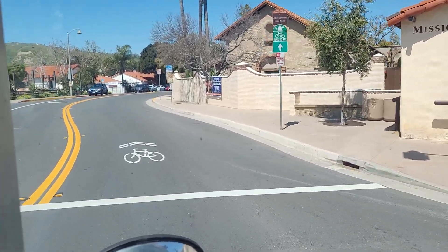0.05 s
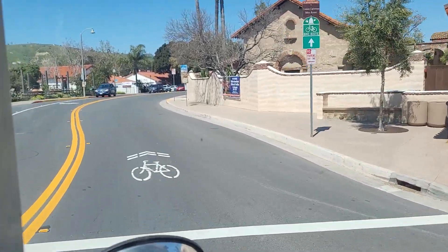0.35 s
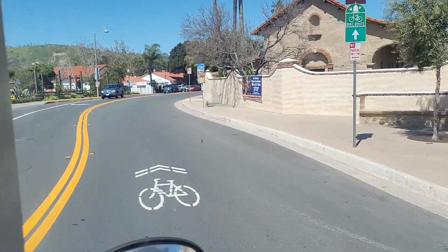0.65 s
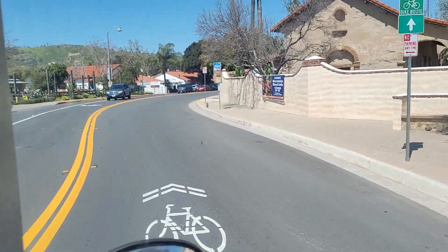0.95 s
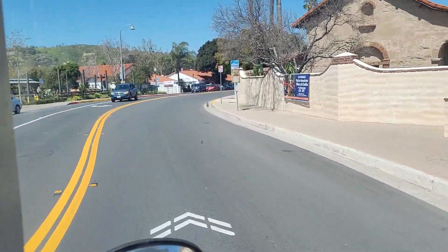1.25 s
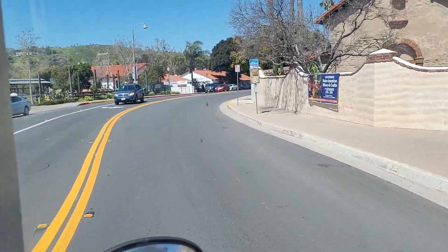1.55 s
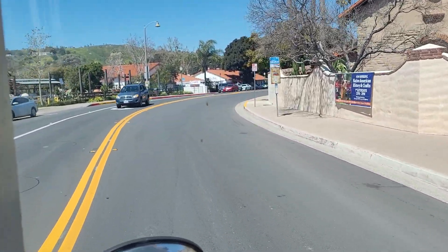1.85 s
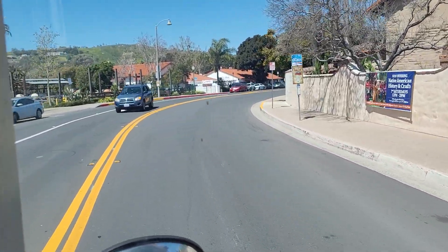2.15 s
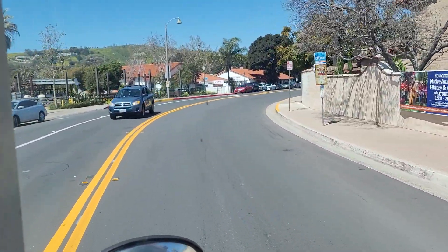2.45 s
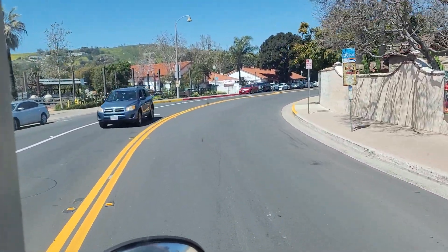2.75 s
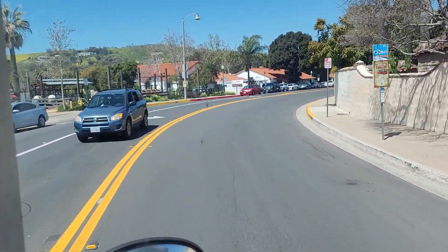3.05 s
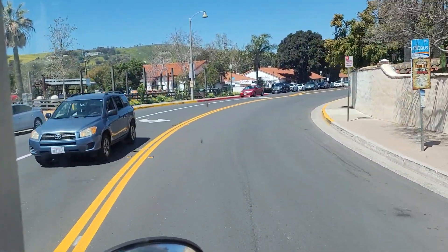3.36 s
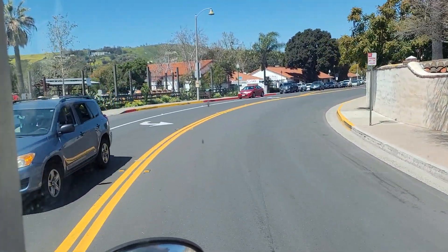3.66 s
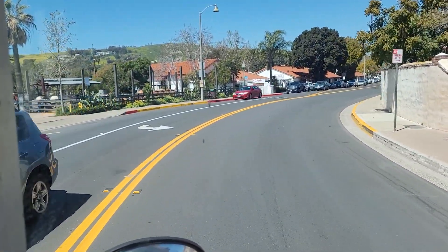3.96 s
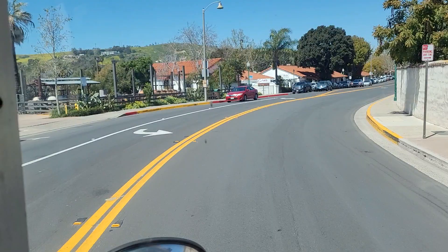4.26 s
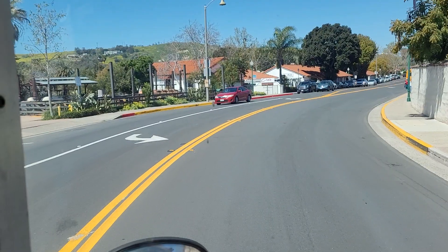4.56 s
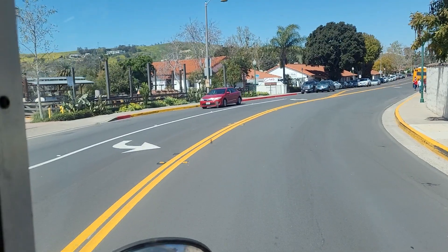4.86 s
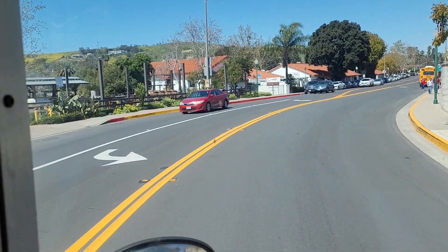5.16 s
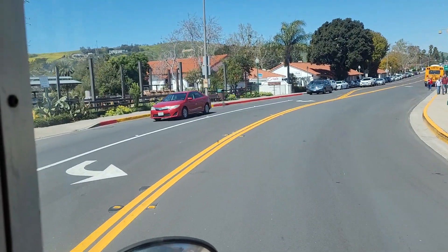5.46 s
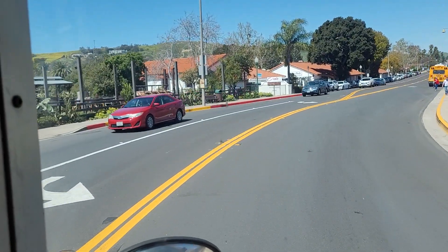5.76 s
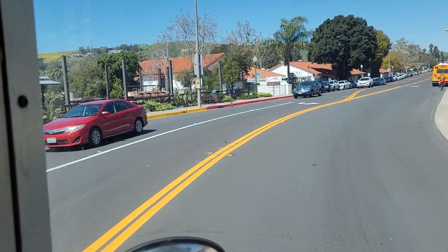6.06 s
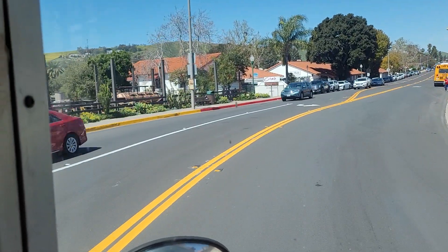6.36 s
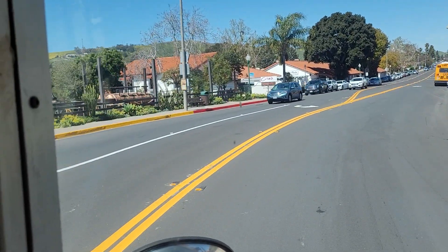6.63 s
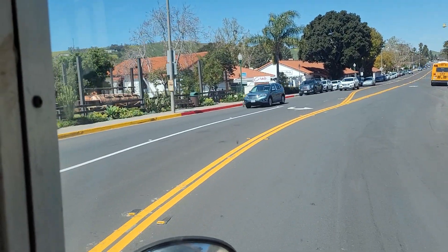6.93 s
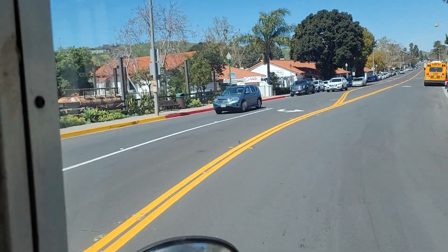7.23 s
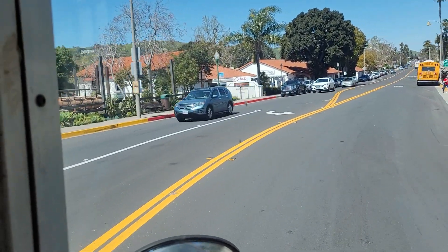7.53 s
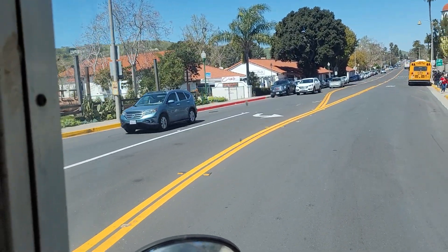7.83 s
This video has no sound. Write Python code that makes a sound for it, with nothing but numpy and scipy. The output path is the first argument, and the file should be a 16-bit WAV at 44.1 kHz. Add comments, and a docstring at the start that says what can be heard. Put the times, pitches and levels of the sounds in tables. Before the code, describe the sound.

A bus drives along with a deep, wavering engine boom and tyres rumbling through the floor, heard from inside near the front. Small ticks, rattles and occasional panel knocks come from around the cabin, with soft air hiss behind them. Later the engine slows, a panel hums briefly and metal clinks once. The drone then swells again at a lower pitch, and the gears give a brief, rough whine.

```python
"""You hear a bus engine boom and drone from inside the small, hard cabin as the bus rounds a bend.
It eases off near 5.4 s, then pulls again at lower revs with a short whine from the gears.
Tyres rumble through the floor and air hisses at the door. Loose fittings tick and chatter,
trim rubs and squeaks, jolted panels knock, and one metal part clinks."""
import sys
import numpy as np
from scipy import signal
from scipy.fft import rfft, irfft, next_fast_len
from scipy.io import wavfile
from scipy.ndimage import map_coordinates

SR = 44100
rng = np.random.default_rng(int(sys.argv[2]) if len(sys.argv) > 2 else 0)


def dump(signal):
    """Clip the signal to [-1, 1] and save it as 16-bit WAV at the path in sys.argv[1]."""
    limited = np.clip(np.atleast_2d(signal).T, -1, 1)
    pcm = np.round(limited * 32767).astype(np.int16)
    wavfile.write(sys.argv[1], SR, pcm)


N = 352359
TIME = np.arange(N) / SR  # seconds since the start
AFTER = np.arange(SR // 3) / SR  # seconds since a short sound began

# the changing road surface: (time [s], tyre level [dB], door hiss level [dB])
ROAD = [(0, -45, -56.5), (.13, -45, -58.5), (.45, -48, -62.5), (.9, -48.5, -60), (1.2, -50, -64.5),
        (1.55, -47.5, -61.5), (2.1, -50, -61.5), (2.7, -50, -65), (3.05, -50, -59), (3.4, -50, -64),
        (3.95, -50.5, -65.5), (4.65, -50, -64), (5, -47.5, -60), (5.3, -50, -64), (6.35, -52, -65.5),
        (6.62, -48.5, -60.5), (6.9, -49.5, -64.5), (7.4, -46.5, -62.5), (7.75, -50.5, -67.5),
        (7.99, -49.5, -64)]


def amp(db):
    """Turn decibels into a number to multiply a sound by."""
    return 10 ** (np.asarray(db) / 20)


def along(points, hz):
    """Read between (frequency, value) points on a log frequency scale."""
    freqs, values = np.transpose(points)
    return np.interp(np.log(hz + 1), np.log(freqs + 1), values)


def curves(rows):
    """One value per sample for each column after the time."""
    times, *columns = np.transpose(rows)
    return [np.interp(TIME, times, column) for column in columns]


def wobble(rate):
    """A smooth random curve through `rate` new values a second."""
    return map_coordinates(rng.standard_normal(int(N * rate / SR) + 4), [TIME * rate])


def swells(rows, floor_db):
    """A steady strength with bell-shaped swells on top."""
    bells = (amp(db) * np.exp(-.5 * ((TIME - s) / width) ** 2) for s, width, db in rows)
    return np.sqrt(amp(floor_db) ** 2 + sum(bell ** 2 for bell in bells))


def fade(seconds):
    """The dying away after a blow: 60 dB down in the given time."""
    return amp(-60 * AFTER / seconds)


def peak(hz, centre, width):
    """A resonance: 1 at its centre, 0.5 half a width away."""
    return 1 / (1 + (2 * (hz - centre) / width) ** 2)


def filtered(x, response):
    """Scale each frequency in x by response(hz)."""
    n = x.shape[-1]
    padded = next_fast_len(n + 8192)
    return irfft(rfft(x, padded) * response(np.fft.rfftfreq(padded, 1 / SR)), padded)[..., :n]


def noise(shape_db, size=N):
    """Stereo noise of strength (rms) 1: both sides alike in the bass, different in the treble."""
    # how alike left and right are: (frequency [Hz], likeness [0 to 1])
    likeness = [(60, 0.81), (150, 1), (260, 1), (400, 0.63), (650, 0.31), (1200, 0.47), (3000, 0.17),
                (8000, 0.062)]
    turn = lambda hz: np.arccos(along(likeness, hz)) / 2
    response = lambda hz: amp(shape_db(hz)) * [np.cos(turn(hz)), np.sin(turn(hz))]
    mid, side = filtered(rng.standard_normal((2, size)), response)
    stereo = np.array([mid + side, mid - side])
    return stereo / np.sqrt(np.mean(stereo ** 2) + 1e-20)


def rush(spectrum, size=N):
    """Noise shaped by points of (frequency [Hz], level [dB])."""
    return noise(lambda hz: along(spectrum, hz), size)


def band(centre_hz, spread):
    """Short noise around one pitch; spread is a fraction of that pitch."""
    return noise(lambda hz: -10 * np.log10(1 + ((hz - centre_hz) / (spread * centre_hz)) ** 4), len(AFTER))


def tone(hz, flutter_db, rate):
    """A sine wave that follows a pitch curve and wavers in level."""
    cycles = np.cumsum(hz) / SR + rng.random()
    return np.sqrt(2) * np.sin(2 * np.pi * cycles) * amp(flutter_db * wobble(rate))


def add(track, s, sound):
    """Mix a sound into a track at s seconds."""
    part = track[:, max(0, round(s * SR)):][:, :sound.shape[-1]]
    part += sound[..., :part.shape[1]]


def cabin(x):
    """Windows and trim ring along; quick echoes off nearby walls colour the middle and treble."""
    # resonances of windows and trim: (frequency [Hz], width [Hz], boost [dB])
    trim = [(342, 18, 0.5), (397, 24, 3.5), (635, 14, -1.5), (1048, 31, 3.5), (1370, 100, 0.5),
            (2280, 110, 1), (2770, 69, 1), (3580, 70, 4), (4120, 390, 1), (7540, 87, -4)]
    delay_s = rng.uniform(.002, .025, (8, 1))
    strength = .1 * rng.choice([-1, 1], (8, 1))
    echoes = lambda hz: np.sum(strength * np.exp(-2j * np.pi * hz * delay_s), axis=0)
    walls = lambda hz: 1 + echoes(hz) * hz ** 2 / (hz ** 2 + 700 ** 2)
    panes = lambda hz: amp(sum(db * peak(hz, centre, width) for centre, width, db in trim) - .7)
    return filtered(x, lambda hz: panes(hz) * walls(hz))


def air():
    """Air hisses around the door and gushes once; a faint high fizz comes and goes."""
    # tone colours of the door hiss and the fizz: (frequency [Hz], level [dB])
    hiss_colour = [(1000, -20), (2000, -3), (2800, 0), (3900, -2), (5000, -4), (7200, -6), (8300, -18),
                   (10000, -30), (16000, -60)]
    fizz_colour = [(5000, -37), (9000, -3), (11500, 2.5), (14200, 3), (15700, 4), (16100, -4.5)]
    # swells of the fizz: (middle time [s], width [s], level [dB])
    fizz_swells = [(.69, .02, -66), (1.68, .05, -65), (2, 0.13, -67), (3.07, .2, -68.5), (4.05, .18, -69),
                   (4.68, 0.067, -71), (5.33, .14, -70.5), (5.88, 0.16, -68), (6.4, 0.14, -72),
                   (6.76, .08, -68), (7.17, .025, -65.5), (7.48, 0.087, -66), (7.97, .04, -64.5)]
    _, hiss_db = curves(ROAD)
    gush = amp(-59) * np.exp(-((TIME - 7.44) / .15) ** 4)  # about 0.3 s long, at 7.44 s
    hiss = np.hypot(amp(hiss_db - 1.5), gush) * amp(1.7 * wobble(60)) * rush(hiss_colour)
    fizz = swells(fizz_swells, floor_db=-78.5) * amp(.9 * wobble(70)) * rush(fizz_colour)
    return hiss + fizz


def road():
    """Bumps heave the floor and the cabin air rumbles; coarser road makes tyres and panels louder."""
    # tone colours of the floor, cabin air, panels and tyres: (frequency [Hz], level [dB])
    floor_colour = [(15, -14), (28, -12.5), (41, 2.5), (52, -6), (65, -1.5), (100, -34), (200, -89)]
    air_colour = [(20, -22.5), (36, -9.5), (52, 4), (72, 4), (84, -0.5), (98, -4), (128, -1.5), (170, -7.5),
                  (200, -6.5), (240, -6.5), (275, -23), (400, -68)]
    panel_colour = [(130, -17), (230, 4), (290, 2), (350, -2.5), (400, -6.5), (470, -6.5), (570, -12),
                    (750, -25.5), (1400, -102)]
    tyre_colour = [(300, -4), (600, 2.5), (750, 1.5), (1050, -3), (1380, -6), (1600, -11.5), (2100, -12.5),
                   (2800, -18.5), (4500, -28), (9000, -53)]
    # bumps in the road: (middle time [s], width [s], level [dB])
    bumps = [(.18, 0.064, -23), (.94, 0.073, -25.5), (1.28, 0.21, -31), (2.29, .09, -21),
             (2.88, 0.11, -24.5), (3.55, .08, -29), (5.98, .13, -34.5), (6.33, .04, -27), (6.85, 0.1, -28)]
    tyre_db, _ = curves(ROAD)
    grit = wobble(30)  # panels and tyres flicker together
    floor = swells(bumps, floor_db=-37) * rush(floor_colour)
    cabin_air = amp(-27.5 + .2 * wobble(5.1)) * rush(air_colour)
    panels = amp(-39 + .61 * (tyre_db - tyre_db.mean()) + .77 * grit) * rush(panel_colour)
    tyres = amp(tyre_db + 3.5 + .83 * grit + .25 * wobble(90)) * rush(tyre_colour)
    return floor + cabin_air + panels + tyres


def jiggle():
    """Trim keeps tapping very faintly, each piece at its own pitch."""
    out = np.zeros((2, N))
    for when, height, force in rng.random((60, 3)):
        tap = band(centre_hz=1100 * 4 ** height, spread=.25) * fade(.07)
        add(out, when * N / SR, amp(-55 + 5 * force - 10 * height) * tap)
    return out


def squeaks():
    """Two pieces of trim rub once with a thin, dry squeak; window seals give short chirps."""
    # tone colour of rubbing trim: (frequency [Hz], level [dB])
    trim_colour = [(4200, -25), (5400, 5), (6100, -8), (6600, -2), (8000, -15), (8900, -8), (10300, -17),
                   (12000, -5), (15000, -20)]
    # chirps of the seals: (middle time [s], half length [s], pitch [Hz], level [dB])
    chirps = [(1.878, .012, 4080, -57), (2.122, .018, 2000, -47.5), (3.706, 0.013, 1950, -61),
              (3.702, .016, 3950, -66)]
    out = amp(-58) * np.exp(-((TIME - 6.068) / .025) ** 4) * rush(trim_colour)  # the squeak, at 6.068 s
    for s, half, pitch_hz, db in chirps:
        rub = noise(lambda hz: 14 * np.log10(peak(hz, pitch_hz, .28 * pitch_hz)), len(AFTER))
        add(out, s - 2 * half, amp(db) * np.exp(-((AFTER - 2 * half) / half) ** 2) * rub)
    return out


def pings():
    """A small metal clip is struck and rings briefly in a few high bands."""
    blows = [(0.5254, -45.5), (.615, -43), (2.2196, -52)]
    rings = [(2800, 900, -11), (4450, 500, -5), (5600, 1200, -0.5), (6600, 500, -6), (7300, 220, 3.5),
             (11600, 300, -6), (12200, 300, -4), (14200, 2000, -15)]
    colour = lambda hz: 10 * np.log10(sum(amp(db) ** 2 * peak(hz, f, width) for f, width, db in rings))
    out = np.zeros((2, N))
    for s, db in blows:
        add(out, s, amp(db - 3) * noise(colour, len(AFTER)) * (fade(.025) + amp(-5.5) * fade(.14)))
    return out


def fitting(clack_db, sizzle_db):
    """A loose fitting rings with a dull clack and a bright sizzle, a little differently at each blow."""
    # tone colour of a fitting: (frequency [Hz], level [dB])
    colour = [(600, -2.5), (1500, 7), (2800, 5), (4000, -1), (5500, 0), (6600, 0.5), (7500, -3.5),
              (8200, -4), (8850, -8), (9600, -2), (11500, -0.5), (14000, 2.5), (15600, 0.5), (16100, 1.5)]
    # resonances of its small metal pieces: (frequency [Hz], average boost [dB])
    pieces = [(4000, 4.5), (4850, 2.5), (5600, 2), (7500, 5.5), (8850, 3.5), (11500, 4), (12400, 4)]
    tilt = [(3500, clack_db), (7000, .0063), (12000, sizzle_db)]
    strengths = 2 * rng.random(len(pieces))
    rings = lambda hz: sum(g * db * peak(hz, centre, 260) for g, (centre, db) in zip(strengths, pieces))
    return noise(lambda hz: along(colour, hz) + along(tilt, hz) + rings(hz), len(AFTER))


def rattles():
    """Loose fittings tick with a snap and a tail in the cabin, or chatter in quick, uneven contacts."""
    # single ticks: (time [s], level [dB], sizzle [dB])
    ticks = [(0.296, -47.5, -11), (.374, -54, -8), (.4277, -57.5, -4.5), (.9614, -49.5, -5.5),
             (1.1337, -49.5, -14), (1.46, -44.5, -29), (1.8386, -51, -6), (1.8765, -48.5, -7.5),
             (2.4287, -41, -11), (2.9467, -48, -4), (3.3267, -45.5, -13), (3.4828, -45.5, -10),
             (3.6097, -43.5, -13.5), (3.6438, -49, -6.5), (3.7605, -45.5, -11), (4.359, -45.5, -15.5),
             (4.9617, -45.5, -13.5), (5.3912, -46.5, -15), (5.5902, -44, -15), (5.6427, -46, -8),
             (5.66, -39.5, -15.5), (6.2222, -45, -15), (6.5926, -44.5, -12.5), (6.9466, -46.5, -12.5),
             (7.0216, -42.5, -10.5), (7.2847, -47, -33), (7.879, -47.5, -11)]
    # bouts of chatter: (middle time [s], half length [s], level [dB], sizzle [dB])
    chatter = [(0.328, 0.02, -57, 0), (0.887, 0.015, -48.5, -8.5), (0.986, .018, -47.5, -5),
               (1.512, 0.018, -55, 0), (1.87, .012, -55.5, -6.5), (2.92, 0.031, -56, -16.5),
               (3.691, 0.017, -51.5, 2.5)]
    out = np.zeros((2, N))
    for s, db, sizzle_db in ticks:
        snap = amp(4) * fade(.007) * fitting(-7, sizzle_db + 22.5)
        tail = (fade(.027) + amp(-2.5) * fade(.18)) * fitting(-.5, sizzle_db + 4.5)
        add(out, s, amp(db - 4.5) * (snap + tail))
    contact_fade = fade(.0063) + amp(-6) * fade(.13)
    for s, half, db, sizzle_db in chatter:
        contacts = rng.random(len(AFTER)) < 900 / SR  # about 900 a second
        bout = contacts * rng.exponential(size=len(AFTER)) * np.exp(-((AFTER - 2 * half) / half) ** 2)
        power = np.abs(signal.fftconvolve(bout, contact_fade ** 2)[:len(AFTER)])
        loudness = np.sqrt(power / (power.max() + 1e-12))
        add(out, s - 2 * half, amp(db + 7.5) * loudness * fitting(2.4, sizzle_db))
    return out


def clink():
    """Metal strikes metal and bounces: a bright clash whose lower part lingers in the cabin."""
    # the strike and its bounces: (time [s], level [dB])
    blows = [(6.4771, -31), (6.4791, -32), (6.489, -42)]
    # ringing notes of the metal: (frequency [Hz], level [dB], fade time [s])
    notes = [(2654, -3, .15), (2745, -4, .2), (2815, -1, .22), (3698, -6, .14), (3870, -6, .16),
             (4020, -8, .17), (7490, -7, .12), (8750, -5, .11), (8855, -4, .11), (11360, -6, .1),
             (11570, -7, .1), (14140, -8, .09)]
    # tone colours of the clash and its echo: (frequency [Hz], level [dB])
    clash_colour = [(700, -24), (1100, 3), (1400, -18), (2350, -14), (2800, 9), (3250, -6), (3900, 3),
                    (5400, -8.5), (7500, -1), (8850, -2), (9700, -7.5), (12300, -3), (16000, -8)]
    echo_colour = [(2350, -16), (2780, 1), (3200, -10), (3900, -4), (5000, -20), (9000, -27)]
    out = np.zeros((2, N))
    for s, db in blows:
        ring = sum(amp(level) * fade(fade_s) * np.sin(2 * np.pi * (hz * AFTER + rng.random((2, 1))))
                   for hz, level, fade_s in notes)
        clash = rush(clash_colour, len(AFTER)) * (fade(.029) + amp(-8.5) * fade(.16))
        echo = rush(echo_colour, len(AFTER)) * fade(.22)
        add(out, s, amp(db) * (amp(-17) * ring + clash + amp(-10) * echo) * (1 - fade(.005)))
    return out


def knocks():
    """Bumps jolt a panel: a short crack, then one fast-fading note with woody noise around it."""
    # jolts of panels and trim: (time [s], level [dB], pitch [Hz], crack [dB])
    jolts = [(1.458, -37, 1016, 5.5), (1.619, -24.5, 316, -22), (3.027, -29, 343.4, -5.5),
             (3.029, -33.5, 884, -1.5), (5.162, -37, 1143, -0.5), (5.663, -36, 1103, -4),
             (5.976, -33, 663.4, -17), (6.008, -24, 450, -20), (6.478, -38, 1050, -8.5),
             (6.912, -44, 699, 3.5), (7.036, -22, 490, -27), (7.293, -28.5, 606.3, -5.5)]
    # tone colour of the crack: (frequency [Hz], level [dB])
    crack_colour = [(200, -3.5), (900, 3), (2500, -10.5), (5500, -21.5), (12000, -37)]
    out = np.zeros((2, N))
    for s, db, pitch_hz, crack_db in jolts:
        note = np.sin(2 * np.pi * pitch_hz * AFTER) + amp(-3) * band(pitch_hz, spread=.15)
        panel = note * fade(.089) * (1 - fade(.02))
        crack = amp(crack_db) * rush(crack_colour, len(AFTER)) * fade(.06) * (1 - fade(.003))
        add(out, s, amp(db - 3) * (panel + crack))
    return out


def hum():
    """A body panel hums for a moment as the engine slows."""
    # the panel's note: (time [s], pitch [Hz], level [dB])
    note = [(5.55, 256, -64), (5.7, 243.8, -46), (5.82, 242, -29), (5.92, 232, -35), (6.05, 237, -68)]
    hz, db = curves(note)
    return amp(db - 2) * tone(hz, flutter_db=1.5, rate=27)


def gears():
    """The gears give a short, rough whine as they take up the load."""
    # the whine: (time [s], pitch [Hz], level [dB])
    whine = [(6.8, 380.7, -63), (7.0, 383, -50.5), (7.2, 380, -52.5), (7.3, 379, -46.5),
             (7.42, 373.4, -43.5), (7.52, 383.7, -46), (7.65, 369, -55.5), (7.8, 366, -69)]
    # the tones in it: (multiple of the pitch, level [dB])
    tones = [(1, 5), (1.333, -1), (1.568, -7.5), (1.67, -13), (2.071, -11.5)]
    hz, db = curves(whine)
    return sum(amp(db + level - 1) * tone(k * hz * (1 + .007 * wobble(70)), flutter_db=2.4, rate=30)
               for k, level in tones)


def engine():
    """A low boom fills the cabin; the drive drones above it, and the drone's octave sets panes ringing."""
    # slowing, cruising, easing off, pulling: (time [s], drone pitch [Hz], boom [dB], drone [dB])
    revs = [(0, 280.8, -32.5, -43), (.1, 275.9, -18.5, -33), (.45, 252, -22.5, -41),
            (.63, 233.7, -15.5, -28.5), (.88, 219.9, -24.5, -38.5), (1.3, 221, -17.5, -41.5),
            (1.7, 219.4, -24.5, -33.5), (2.38, 220.7, -20.5, -37), (2.7, 223.3, -22.5, -35.5),
            (3.15, 223.1, -20.5, -31.5), (3.75, 221.6, -22, -37.5), (4.3, 222.7, -22.5, -30.5),
            (5.36, 220.2, -20.5, -32.5), (5.55, 203, -35, -33.5), (6.1, 153.5, -34, -38),
            (6.4, 169.8, -59, -34), (7.02, 165.5, -32, -23), (7.35, 159, -44, -34.5),
            (7.99, 157.6, -37, -31.5)]
    # weak overtones of the boom: (multiple of its pitch, level [dB])
    boom_tones = [(2, -48.5), (3, -45), (7, -57.5)]
    # resonances of the panes: (frequency [Hz], width [Hz], boost [dB])
    panes = [(445.7, 22, 10.5), (383, 26, 14.5)]
    drive_ratio, cruise_hz = 3.86, 219  # drone cycles per boom cycle; drone pitch when cruising
    hz, boom_db, drone_db = curves(revs)
    boom_hz = hz / drive_ratio
    boom = amp(boom_db - .6) * tone(boom_hz, flutter_db=.33, rate=10)
    overtones = sum(amp(db) * tone(k * boom_hz, flutter_db=4, rate=12) for k, db in boom_tones)
    flutter_db = 1 + .0366 * np.abs(hz - cruise_hz)  # rougher away from cruising speed
    drone = amp(drone_db - .3) * tone(hz * (1 + .002 * wobble(40)), flutter_db, rate=24)
    pane_db = sum(db * peak(2 * hz, centre, width) for centre, width, db in panes)
    octave_db = -57.5 + .45 * (drone_db - drone_db.mean()) + pane_db
    octave = amp(octave_db) * tone(2 * hz, flutter_db=2, rate=10)
    return boom + overtones + drone + octave


def scene():
    """Everything as it arrives at the front seat."""
    direct = engine() + gears() + hum() + clink() + knocks() + pings()
    return direct + cabin(road() + air() + rattles() + jiggle() + squeaks())


def record(dry):
    """The left side gets more of the middle, the right more of the top; both end near 16 kHz."""
    # how much louder the left is: (frequency [Hz], left minus right [dB])
    balance = [(30, 1.7), (130, 1.1), (300, 3.2), (600, 4.8), (1300, 5.6), (2800, 4), (6500, 4.4),
               (8500, -2), (11500, -8), (15000, -7)]
    # how far the left wave runs ahead: (frequency [Hz], phase [radians])
    lead = [(30, -.05), (60, -.07), (500, -.1), (1030, 1.8), (1400, 1.5), (2800, 3.9), (4400, 3.5),
            (5500, 6)]
    side = np.array([[.5], [-.5]])
    stereo = lambda hz: amp(side * along(balance, hz)) * np.exp(1j * side * along(lead, hz))
    return filtered(dry, lambda hz: stereo(hz) / (1 + (hz / 16000) ** 200))


dry = scene()
out = record(dry)
dump(out)
```